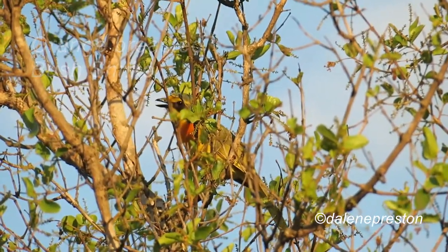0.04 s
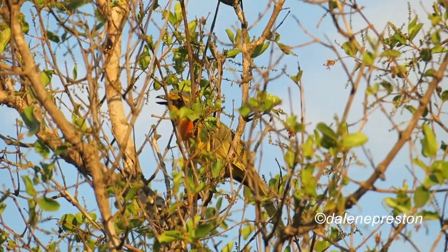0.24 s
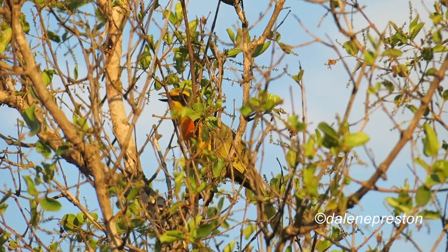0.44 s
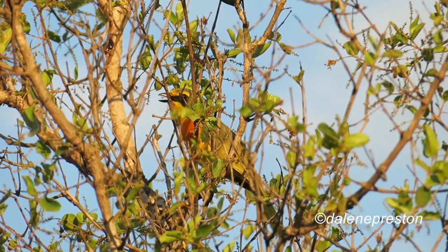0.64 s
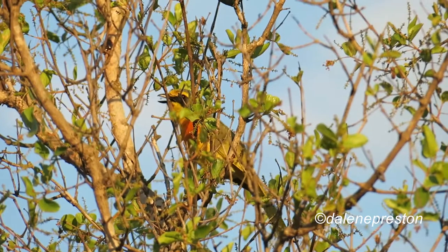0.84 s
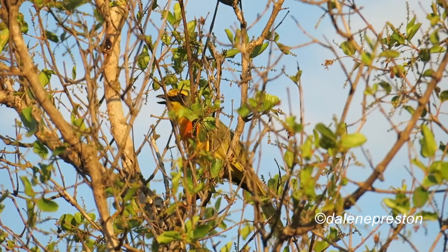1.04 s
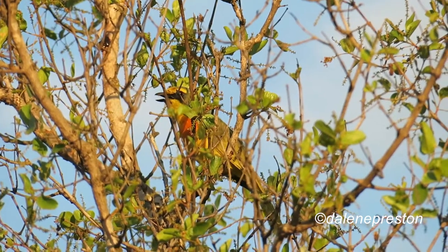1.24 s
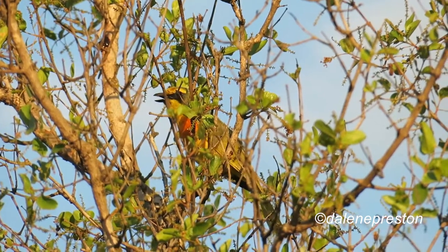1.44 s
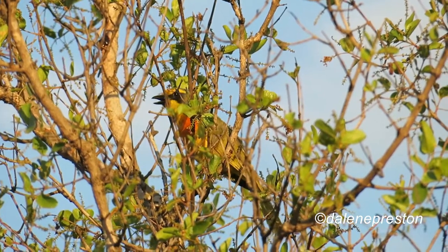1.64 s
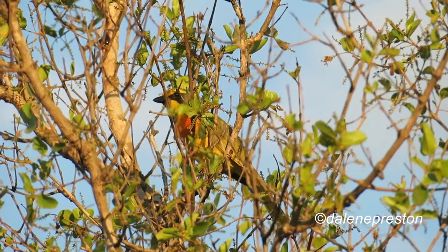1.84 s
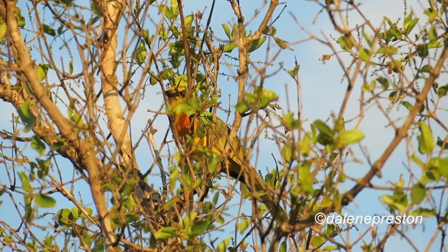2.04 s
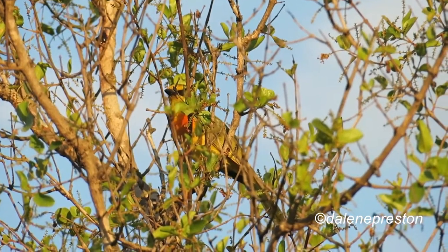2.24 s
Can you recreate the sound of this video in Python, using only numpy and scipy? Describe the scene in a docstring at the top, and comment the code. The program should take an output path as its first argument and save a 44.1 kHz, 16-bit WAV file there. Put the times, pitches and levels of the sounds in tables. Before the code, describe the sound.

From about 0.1 to 1.75 seconds a bushshrike whistles eleven pure, scooped notes near 2.1 kHz, one every 0.17 seconds, the first faint, then strong and even. A fainter second bird slurs quickly up and down on the left from 0.2 to 1.4. Wind thumps at 0.7-1.3 and 1.8, with a click near 1. Afterwards, hiss, distant chirps, a faint falling whistle ending near 2.05 and thin upslurs remain.

```python
"""Air hiss, low wind, a faint hum, rustles and distant chirping birds are there from the start.
A bushshrike soon whistles eleven pure, scooped notes: sine tones with a drawn pitch and swell.
A second bird joins with sliding sine tones; then come wind thumps (short dying waves) and one click.
Late on, a faint whistle falls and two thin ones rise. The wind and air are filtered noise.
All the birds have a soft woodland echo, made with fading noise."""
import sys
import numpy as np
from scipy import signal
from scipy.io import wavfile
from scipy.ndimage import uniform_filter1d

SR = 44100
rng = np.random.default_rng(int(sys.argv[2]) if len(sys.argv) > 2 else 0)


def bounce(signal):
    """Save signal as a 16-bit WAV file at the path given by the first command-line argument."""
    frames = np.transpose(np.atleast_2d(signal))
    limited = np.clip(frames, -1, 1)
    pcm = np.round(limited * 32767).astype(np.int16)
    wavfile.write(sys.argv[1], SR, pcm)


N = 101429
TIME = np.arange(N) / SR   # seconds

# Levels in dB are those of each sound before it is panned. Pan is left minus right, in dB.
# Steady hiss. Each row: pitch in Hz, relative level in dB per Hz.
AIR_COLOUR = [(150, -0.5), (400, -13.5), (1000, -18.5), (1700, -20.5), (2900, -20), (4500, -22.5),
              (6500, -30.5), (7400, -22.5), (9500, -12.5), (15000, -25.5)]
# How alike the hiss is on both sides. Each row: pitch in Hz, likeness from -1 to 1.
AIR_LIKENESS = [(1500, 0.42), (4000, 0.06), (9000, -0.59)]
AIR_DB, TREBLE_EDGE_HZ = -48.5, 9850

# The breeze between gusts. Each row: time in seconds, level in dB.
BREEZE = [(0, -55.5), (1.05, -38.5), (2.3, -56)]
# Tone of the wind. Each row: pitch in Hz, relative level in dB per Hz.
WIND_TONE = [(25, -5.5), (65, 3.5), (140, -11), (220, -21.5), (420, -47)]
# Gusts. Each row: middle in seconds, level in dB.
WIND_GUSTS = [(0.045, -43), (0.518, -39), (0.588, -35), (0.727, -34), (1.049, -29), (1.151, -30.5),
              (1.237, -29.5), (1.388, -35), (1.69, -40), (1.831, -33), (2.048, -36)]
GUST_HALF_S = 0.033
WIND_LIKENESS, WIND_PAN_DB = 0.96, -1.7
EDDY_LAG_S = 0.00099   # eddies reach the right side later
# Thumps on the microphone. Each row: start in seconds, ring in Hz, level in dB.
WIND_THUMPS = [(0.701, 162, -26), (0.774, 68, -26.5), (0.971, 112, -15.5), (1.064, 259, -19),
               (1.246, 90.6, -24), (1.798, 105, -19.5)]
THUMP_CYCLES = 0.67   # cycles from the start to the loudest point

HUM_HZ, HUM_DB, HUM_END_S = 346.5, -61, 0.47
# Short rustles. Each row: middle in seconds, half length in seconds, centre in Hz, level in dB.
RUSTLE_ROWS = [(0.007, 0.05, 3870, -51), (1.048, 0.024, 1060, -55), (1.746, 0.012, 364, -44.5),
               (1.791, 0.03, 283, -42), (1.878, 0.028, 980, -53), (1.928, 0.041, 2470, -53),
               (2.191, 0.0085, 341, -45)]
RUSTLE_WIDTH = 0.19   # share of the centre pitch, on each side
CLICK_S, CLICK_DB, CLICK_DULL_HZ = 0.978, -18.5, 231   # dulled above this pitch

# Level of the distant chatter. Each row: time in seconds, level in dB.
TWITTER_LEVEL = [(0, -62.5), (1.3, -69.5), (1.5, -61.5), (2.2, -58)]
TWITTER_PER_S, TWITTER_HZ, TWITTER_S = 120, 4954, 0.022   # rate, middle pitch, chip length
# Arched chips of small birds. Each row: time of the top in seconds, top pitch in Hz.
CHIP_TOPS = [(0.03, 5680), (0.085, 5490), (.135, 5150), (1.459, 5820), (1.5, 5760), (1.509, 6040),
             (1.531, 5300), (1.564, 5300), (1.578, 5670), (1.637, 5580), (1.689, 5240), (2.017, 5700),
             (2.063, 3850)]
CHIP_S, CHIP_DB = 0.03, -53
CHIP_ARCH_HZ, CHIP_HALF_FALL_HZ = 599, 260.1   # the height of the arch, half the drop from start to end
FAR_PAN_DB, FAR_WET_DB = -4, -6.5   # wet: echo level

# Whistled notes. Each row: peak time in seconds, swell length in seconds, peak level in dB,
# pitch at the bottom of the scoop in Hz.
WHISTLES = [(0.103, 0.031, -33.5, 2046), (.260, 0.049, -22.5, 2046), (.426, 0.063, -21, 2068),
            (0.596, 0.073, -18.5, 2098), (0.764, 0.081, -17.5, 2108), (0.929, 0.087, -17.5, 2116),
            (1.071, 0.084, -17, 2125), (1.238, 0.094, -17, 2134), (1.404, 0.09, -16.5, 2142),
            (1.575, 0.096, -17, 2139), (1.751, 0.088, -17.5, 2116)]
TOP_HZ, RISE_HZ_PER_S = 2204.7, 1530   # pitch aimed for at the peak, and its climb past it
SHOULDER_HZ = 63.9   # a note starts about this far above the bottom of its scoop
SCOOP_AT, SCOOP_WIDTH = 0.42, 0.236   # shares of the swell, counted back from the peak
ONSET_AT, ONSET_WIDTH = 0.64, 0.1   # shares of the swell, counted the same way
BODY_DB, ACCENT_S, RELEASE_S = -4.5, 0.015, 0.0087   # the held part, then the accent that ends a note
# Overtones of the whistle. Each row: multiple of the pitch, level in dB against the note.
WHISTLE_OVERTONES = [(2, -32), (3, -42.5), (6, -39)]
# Reflections from nearby branches and the ground. Each row: delay in seconds, level in dB.
BRANCH_ECHOES = [(.024, -26.5), (.046, -33.5)]
WHISTLE_PAN_DB, WHISTLE_WET_DB, WAVER_HZ = -3.1, -15, 12.1
WHISTLE_LEAD_S = 0.00004   # the left side hears the bird first
WOOD_T60_S, WOOD_DELAY_S = 0.5, 0.0028   # time to fade by 60 dB, and how softly the echo sets in

# The second bird's slurs, several joined into each phrase. Each row: start in seconds,
# length in seconds, start pitch in Hz, end pitch in Hz, bow at the middle in Hz.
NEIGHBOUR_SLURS = [(.222, 0.063, 2450, 4410, 274), (.297, 0.022, 4900, 3250, -130),
                   (.321, .027, 3270, 4640, -2), (.364, .023, 5000, 2980, 7),
                   (.387, 0.023, 3470, 4610, -70), (.782, 0.036, 4940, 4270, -2),
                   (.811, 0.024, 4440, 2830, 99.5), (.832, .036, 3300, 2140, 389.5),
                   (.943, 0.04, 2690, 4050, -34.5), (.991, 0.01, 2950, 3990, 107.5),
                   (1.008, 0.038, 3730, 2220, -10), (1.088, .04, 2840, 4320, -200),
                   (1.135, 0.0039, 3560, 4380, -4), (1.222, .016, 3130, 2130, 0),
                   (1.25, 0.038, 2440, 4250, 97), (1.33, 0.05, 4590, 3540, 483),
                   (1.382, 0.019, 3740, 2870, -140)]
SLUR_PAN_DB, SLUR_WET_DB = -12, -7.5
SLUR_DB, SLUR_GROWTH_DB_PER_S = -44.5, 3   # its level at time zero, which grows through the song
SLUR_LOUDEST_HZ, SLUR_LOSS_DB_PER_KHZ = 3170, 4.5   # it is weaker above and below this pitch

# A long, faint falling whistle. Each row: time in seconds, pitch in Hz, level in dB.
FALLING_PATH = [(1.59, 4350, -65), (1.8, 3560, -61), (2.045, 2500, -54)]
# Thin upslurs far away. Each row: start in seconds, length in seconds, start pitch in Hz,
# end pitch in Hz, bow at the middle in Hz.
UPSLUR_ROWS = [(1.799, 0.04, 4750, 6080, 295), (2.125, .048, 4950, 6620, -200)]
UPSLUR_DB = -56.5
STOP_HZ = 16550   # from here up the final filter takes away at least 70 dB


def from_db(db):
    """Turn decibels into gain."""
    return 10 ** (np.asarray(db) / 20)


def rms_one(x):
    """Scale to an average power of one."""
    return x / np.sqrt(np.mean(x ** 2) + 1e-20)


def at_hz(points, hz):
    """Read between table rows, with pitch spaced by ratio as the ear hears it."""
    table_hz, values = np.transpose(points)
    return np.interp(np.log(hz), np.log(table_hz), values)


def pan(db):
    """Left and right gains for a level difference."""
    return from_db(np.array([[db], [-db]]) / 2)


def band(x, low_hz, high_hz):
    """Keep only the sound between two pitches."""
    edges = [low_hz, min(high_hz, SR / 2 - 1000)]
    return signal.sosfilt(signal.butter(2, edges, "band", fs=SR, output="sos"), x)


def delayed(x, seconds):
    """Play a signal later, even by a fraction of a sample."""
    return np.interp(TIME - seconds, TIME, x, left=0)


def drift(rate):
    """Smooth chance: random points, so many per second, joined by straight lines."""
    knots = rng.standard_normal(1024)
    return np.interp(TIME * rate, np.arange(len(knots)), knots)


def coloured_noise(spectrum, alike, edges):
    """Stereo noise in bands, each with its own level and left-right likeness."""
    out = 0
    white = rng.standard_normal((2, 2, N + SR // 4))   # the extra quarter second lets the filters settle
    for k, (low, high) in enumerate(zip(edges, edges[1:])):
        mid, side = band(band(white[k % 2], low, high), low, high)[:, -N:]
        hz = np.sqrt(low * high)
        likeness = np.clip(at_hz(alike, hz), -1, 1)
        shared = np.sqrt(1 + likeness) * mid
        opposed = np.sqrt(1 - likeness) * side * [[1], [-1]]
        out = out + from_db(at_hz(spectrum, hz)) * (shared + opposed)
    return rms_one(out)


def woodland(x):
    """Scatter from trunks and leaves: fading noise as an echo, different on each side."""
    t = TIME[:SR]
    fade = from_db(-60 * t / WOOD_T60_S) * (1 - np.exp(-(t / WOOD_DELAY_S) ** 2))
    tail = rng.standard_normal((2, SR)) * fade
    tail /= np.sqrt(np.sum(tail ** 2, axis=1, keepdims=True))
    return signal.fftconvolve(x[None], tail, axes=1)[:, :N]


def slurs(rows, taper, level_db):
    """Pure tones that slide along a bowed line and flutter; level_db gives level from time and pitch."""
    out = np.zeros(N)
    for start, length, from_hz, to_hz, bow_hz in rows:
        near = (TIME >= start) & (TIME < start + length)
        u = (TIME[near] - start) / length
        hz = from_hz + (to_hz - from_hz) * u + bow_hz * (1 - (2 * u - 1) ** 2)
        gain = from_db(level_db(TIME[near], hz)) * signal.windows.tukey(len(u), taper)
        out[near] += gain * np.sin(2 * np.pi * np.cumsum(hz) / SR)
    return out * from_db(2 * drift(200))


def chip(top_s, top_hz, length_s):
    """The slur of one chip: a short rise, an arch and a longer fall."""
    middle_hz = top_hz - CHIP_ARCH_HZ - (CHIP_HALF_FALL_HZ / 2) ** 2 / CHIP_ARCH_HZ
    rise_s = length_s / 2 * (1 - CHIP_HALF_FALL_HZ / (2 * CHIP_ARCH_HZ))
    start_hz, end_hz = middle_hz + CHIP_HALF_FALL_HZ, middle_hz - CHIP_HALF_FALL_HZ
    return top_s - rise_s, length_s, start_hz, end_hz, CHIP_ARCH_HZ


def air():
    """Steady outdoor hush and microphone hiss as noise; above about 10 kHz everything is cut away steeply."""
    hush = coloured_noise(AIR_COLOUR, AIR_LIKENESS, np.geomspace(120, 15500, 29))
    return from_db(AIR_DB) * signal.sosfilt(signal.butter(10, TREBLE_EDGE_HZ, fs=SR, output="sos"), hush)


def wind():
    """Low buffeting in short gusts, with thumps; it crosses from left to right."""
    force = from_db(np.interp(TIME, *np.transpose(BREEZE)))
    for s, db in WIND_GUSTS:
        force += from_db(db) * np.exp(-((TIME - s) / GUST_HALF_S) ** 2)
    eddies = coloured_noise(WIND_TONE, [(1, WIND_LIKENESS)], np.geomspace(20, 450, 11))
    # Even out the noise, so the force sets the level
    power = uniform_filter1d(np.mean(eddies ** 2, axis=0), int(2 * GUST_HALF_S * SR))
    left, right = force * eddies / np.sqrt(power + 1e-20) + thumps()
    return pan(WIND_PAN_DB) * [left, delayed(right, EDDY_LAG_S)]


def hum():
    """A faint, slightly wandering tone at the start, which fades out."""
    fade = np.clip((HUM_END_S - TIME) * 20, 0, 1)
    tone = np.sin(2 * np.pi * HUM_HZ * TIME + drift(25) / 2)
    return from_db(HUM_DB) * np.sqrt(2) * tone * fade


def rustles():
    """Soft brushes: narrow bands of noise that swell and fade."""
    out = np.zeros(N)
    for s, half_s, hz, db in RUSTLE_ROWS:
        noise = band(rng.standard_normal(N), hz / (1 + RUSTLE_WIDTH), hz * (1 + RUSTLE_WIDTH))
        out += from_db(db) * np.exp(-((TIME - s) / half_s) ** 2) * rms_one(noise)
    return out


def twitter():
    """Distant birds: faint short chips at chance times and pitches."""
    chance = rng.standard_normal(size=(400, 2))
    times = (np.arange(len(chance)) + chance[:, 0]) / TWITTER_PER_S
    pitches = TWITTER_HZ * (1 + 0.08 * chance[:, 1])
    rows = [chip(s, hz, TWITTER_S) for s, hz in zip(times, pitches) if s < TIME[-1]]
    return slurs(rows, 0.75, lambda t, hz: np.interp(t, *np.transpose(TWITTER_LEVEL)))


def small_birds():
    """Separate chips: pure tones whose pitch draws an arch."""
    rows = [chip(s, hz, CHIP_S) for s, hz in CHIP_TOPS]
    return slurs(rows, 0.59, lambda t, hz: CHIP_DB)


def bushshrike():
    """Each note swells, scoops in pitch and ends on a rising accent; overtones show in the held part."""
    out, waver = np.zeros(N), WAVER_HZ * drift(150)
    body = from_db(BODY_DB)
    for peak_s, swell_s, db, low_hz in WHISTLES:
        near = np.abs(TIME - peak_s) < 2 * swell_s
        t = TIME[near] - peak_s
        before = -t / swell_s   # share of the swell still to go
        rim_hz = np.where(before > SCOOP_AT, low_hz + SHOULDER_HZ, TOP_HZ + RISE_HZ_PER_S * t)
        scoop = np.exp(-((before - SCOOP_AT) / SCOOP_WIDTH) ** 2)
        hz = rim_hz + (low_hz - rim_hz) * scoop + waver[near]
        phase = 2 * np.pi * np.cumsum(hz) / SR
        release = np.exp(-(np.maximum(t, 0) / RELEASE_S) ** 2)
        gate = release / (1 + np.exp((before - ONSET_AT) / ONSET_WIDTH))
        accent = np.exp(-(np.minimum(t, 0) / ACCENT_S) ** 2)
        overtones = sum(from_db(level) * np.sin(round(k) * phase) for k, level in WHISTLE_OVERTONES)
        tone = (body + (1 - body) * accent) * np.sin(phase)
        out[near] += from_db(db) * gate * (tone + gate * (1 - accent) * overtones)
    heard = out + sum(from_db(db) * delayed(out, delay) for delay, db in BRANCH_ECHOES)
    direct = pan(WHISTLE_PAN_DB) * [heard, delayed(heard, WHISTLE_LEAD_S)]
    return direct + from_db(WHISTLE_WET_DB) * woodland(out)


def neighbour():
    """The second bird slurs up and down, fading towards both ends of its range."""
    def level_db(t, hz):
        """Louder with time, weaker away from its best pitch."""
        loss = SLUR_LOSS_DB_PER_KHZ * np.abs(hz - SLUR_LOUDEST_HZ) / 1000
        return SLUR_DB + SLUR_GROWTH_DB_PER_S * t - loss

    voice = slurs(NEIGHBOUR_SLURS, 0.2, level_db)
    return pan(SLUR_PAN_DB) * (voice + from_db(SLUR_WET_DB) * woodland(voice))


def thumps():
    """Thumps on the microphone: low waves that swell and die in a few cycles."""
    out = np.zeros(N)
    for s, hz, db in WIND_THUMPS:
        cycles = np.maximum(TIME - s, 0) * hz
        age = cycles / THUMP_CYCLES
        out += from_db(db) * (age * np.exp(1 - age)) ** 2 * np.sin(2 * np.pi * cycles)
    return out


def click():
    """One dry click: a sudden jump that dies away at once, with its edge softened."""
    age = np.maximum(TIME - CLICK_S, 0)
    snap = from_db(CLICK_DB) * (TIME >= CLICK_S) * np.exp(-2 * np.pi * CLICK_DULL_HZ * age)
    return signal.sosfilt(signal.butter(1, 9000, fs=SR, output="sos"), snap)


def falling_whistle():
    """One slow downward glide of a pure tone that grows louder and stops short."""
    s, hz, db = np.transpose(FALLING_PATH)
    gate = np.clip(np.minimum(TIME - s[0], s[-1] - TIME) / 0.01, 0, 1)
    gain = from_db(np.interp(TIME, s, db) + 2 * drift(80))
    return gate * gain * np.sin(2 * np.pi * np.cumsum(np.interp(TIME, s, hz)) / SR)


def upslurs():
    """Thin far whistles: pure tones that slide upwards."""
    return slurs(UPSLUR_ROWS, 0.29, lambda t, hz: UPSLUR_DB)


def far_birds():
    """All the birds further off, sharing one place and one woodland echo."""
    far = twitter() + small_birds() + falling_whistle() + upslurs()
    return pan(FAR_PAN_DB) * (far + from_db(FAR_WET_DB) * woodland(far))


def scene():
    """Birds, wind, small noises and hush together."""
    small_noises = hum() + rustles() + click()   # the same on both sides
    return air() + wind() + small_noises + far_birds() + bushshrike() + neighbour()


def record(dry):
    """Cut the very top of the treble steeply."""
    return signal.sosfilt(signal.cheby2(12, 70, STOP_HZ, fs=SR, output="sos"), dry)


dry = scene()
out = record(dry)
bounce(out)
```